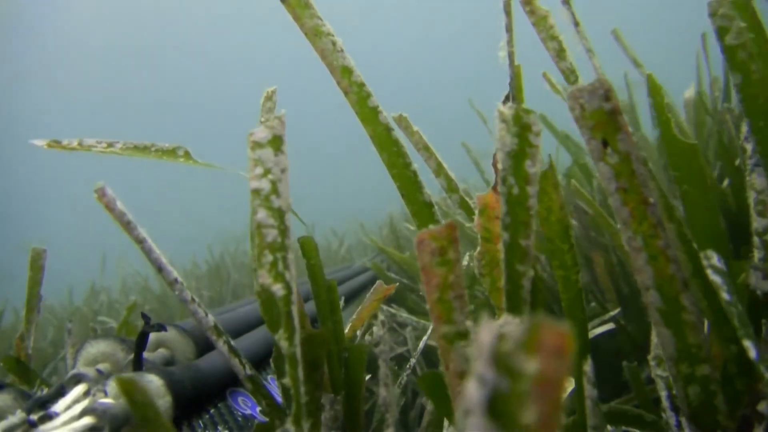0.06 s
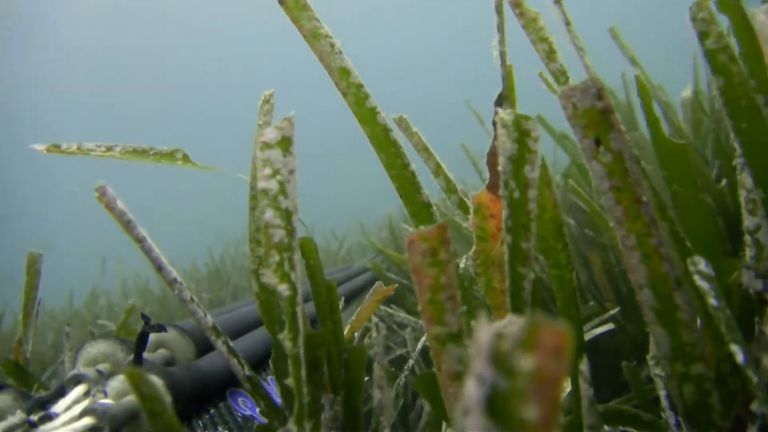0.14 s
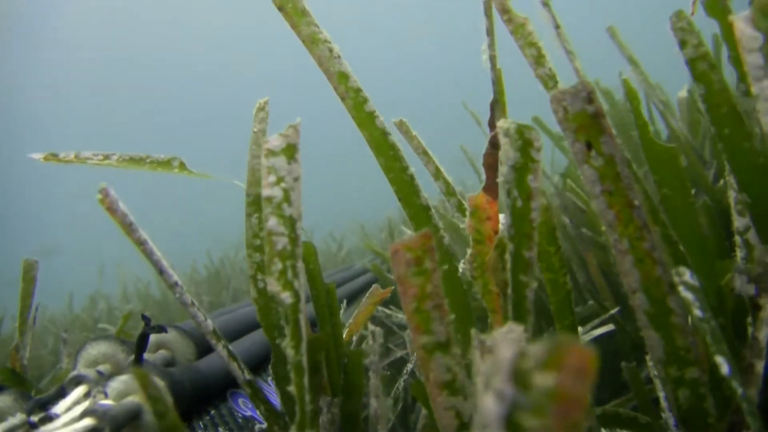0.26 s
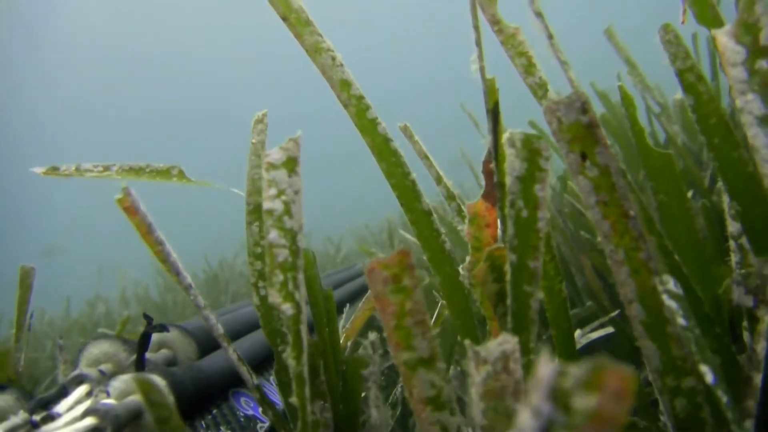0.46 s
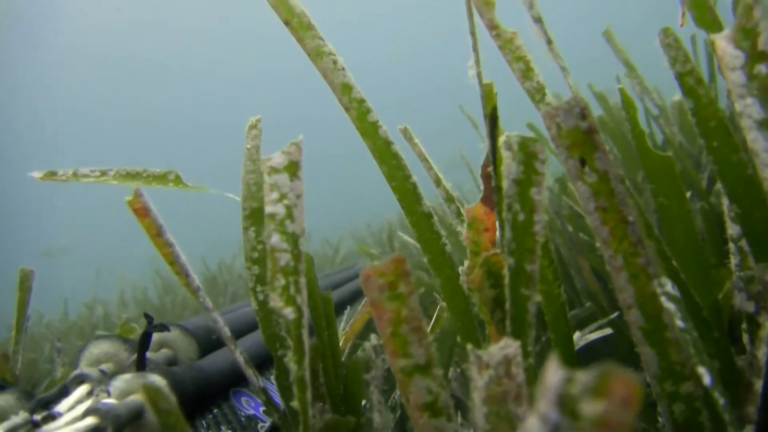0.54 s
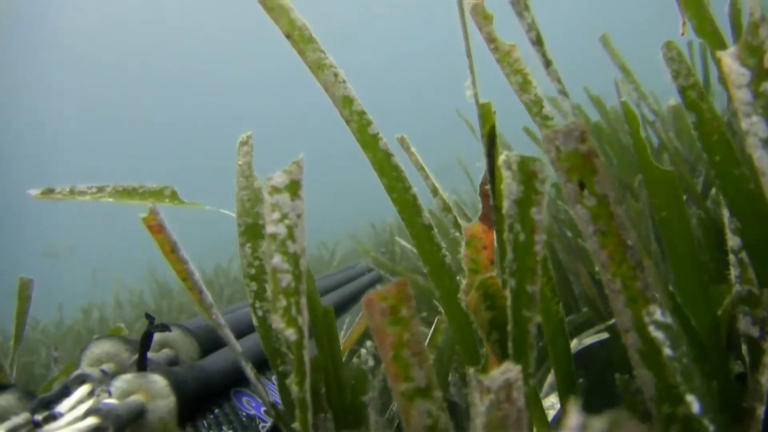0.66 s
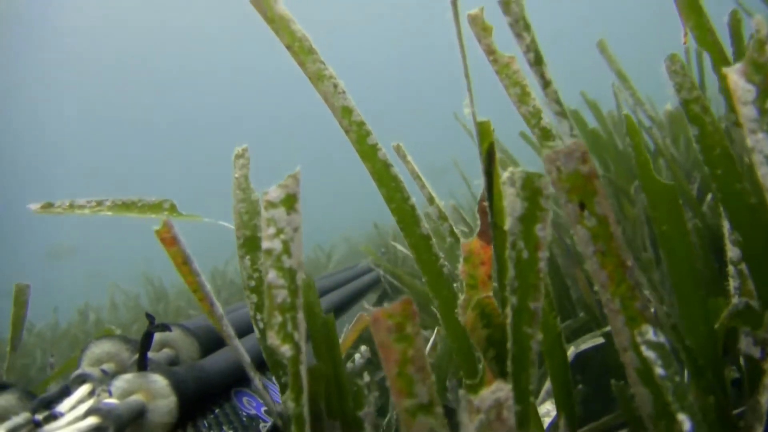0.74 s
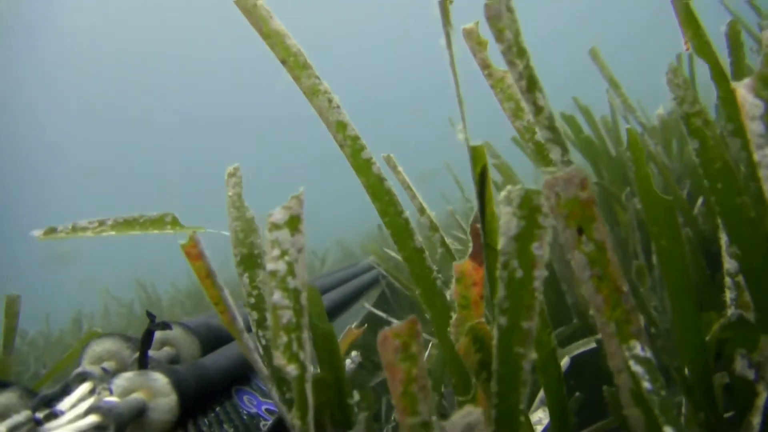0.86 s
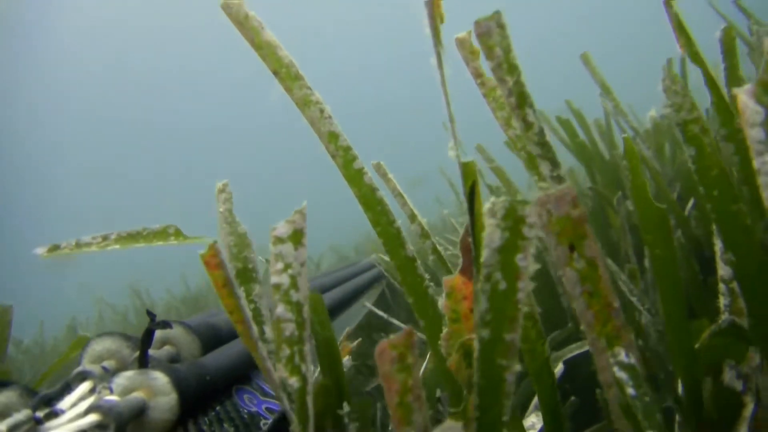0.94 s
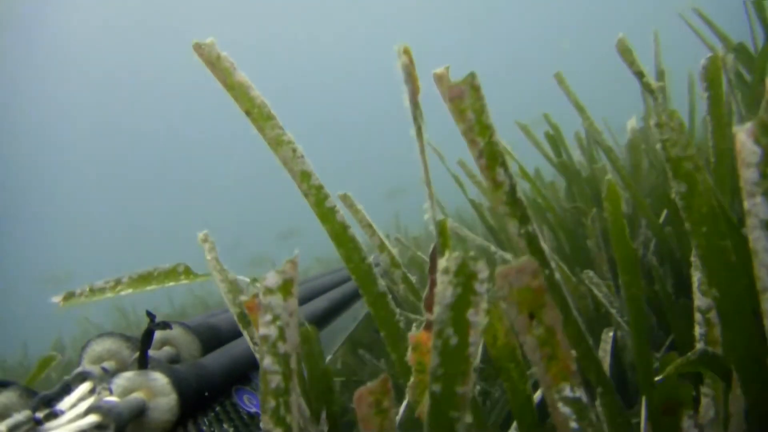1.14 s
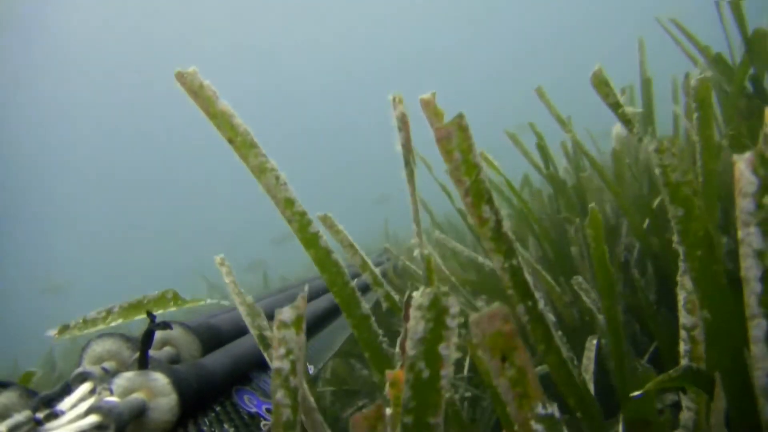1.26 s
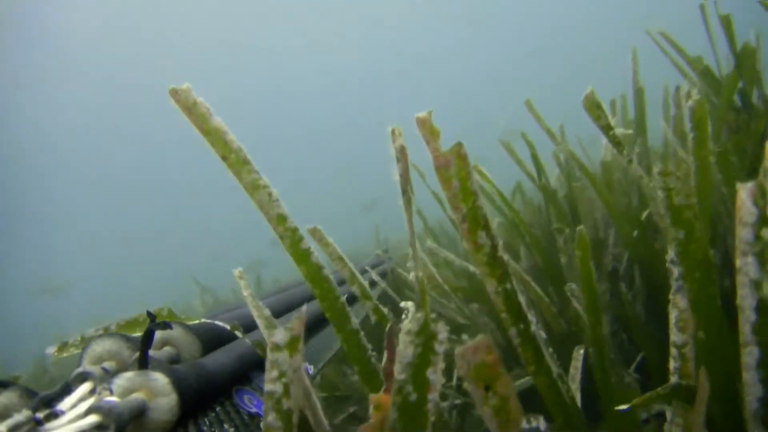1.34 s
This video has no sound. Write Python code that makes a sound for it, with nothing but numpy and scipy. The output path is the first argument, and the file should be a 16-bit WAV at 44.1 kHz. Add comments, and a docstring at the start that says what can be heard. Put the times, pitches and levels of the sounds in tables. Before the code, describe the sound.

A fish seems to grunt twice underwater amid rustling seagrass, tiny clicks and low rumble.

```python
"""A seagrass bed under water, heard from inside a camera housing.
Leaves brush the housing more and more busily and bump it softly; they and the moving water set it ringing.
Two short grunts, perhaps a fish, are pulse trains that slow quickly and fall through low resonances.
A few sharp clicks, probably snapping shrimp, cut through a low water rumble and a faint hiss."""
import sys
import numpy as np
from scipy import signal
from scipy.fft import rfft, irfft
from scipy.io import wavfile

SR = 44100
rng = np.random.default_rng(int(sys.argv[2]) if len(sys.argv) > 2 else 0)


def wrap_up_sound(samples):
    """Save the sound to the file named by the first command line argument, as 16-bit audio."""
    columns = np.atleast_2d(samples).T
    # keep every value between -1 and 1, then stretch to whole-number steps
    tamed = np.clip(columns, -1, 1)
    steps = np.round(tamed * 32767).astype(np.int16)
    wavfile.write(sys.argv[1], SR, steps)


N = 61739
TIME = np.arange(N) / SR

# colour of the water rumble: freq_hz, relative_db
RUMBLE_SPECTRUM = [(20, -14), (50, -17), (90, -1), (150, 0), (200, 0), (280, -4.5), (420, -6.5), (800, -1),
                   (3000, -57)]
# colour of the hiss: freq_hz, relative_db
HISS_SPECTRUM = [(300, 8.5), (1500, 12), (2300, -5.5), (4700, 0), (6000, -3.5), (9400, 1.5), (10300, -11.5),
                 (11300, -45.5), (15500, -19)]
# how hard the leaves brush: time_s, force_db
BRUSH_FORCE = [(0, -60), (.15, -41), (.25, -44), (.31, -47), (.42, -42.5), (.55, -48.5), (.66, -41.5),
               (.72, -38.5), (.83, -43), (.91, -42.5), (.97, -35), (1.06, -35), (1.13, -32.5),
               (1.21, -32.5), (1.27, -33), (1.33, -37.5), (1.4, -40.5)]
# modes of the housing: pitch_hz, width_hz, brushed_db, bumped_db, stereo_likeness
HOUSING_MODES = [(553.3, 36.6, -8, -4, 0.78), (656, 47, -12.5, -10.5, 1), (803, 58, -5, -36.5, 0.86),
                 (972, 100, -12.5, -38.5, .55), (1277, 110, -8, -41.5, 0.076), (1500, 150, -21, -12, -0.94),
                 (1666, 91, -12.5, -33, 0.71), (2750, 1800, -14.5, -20, -1.3),
                 (3626, 130, -35.5, -21.5, 0.12), (4700, 630, -21.5, -22, -0.52)]
# single leaves flicking across: start_s, level_db, pitch_hz
LEAF_FLICKS = [(.136, -48, 724), (0.457, -35.5, 1483), (0.693, -28, 780), (.698, -32.5, 1370),
               (.711, -31.5, 810), (.771, -28.5, 788), (.886, -29, 1360), (0.921, -27.5, 855),
               (.955, -26.5, 1345), (.984, -40, 798), (1.028, -32, 1723), (1.108, -28, 783),
               (1.169, -27.5, 820), (1.194, -25, 868), (1.249, -34, 930)]
# soft bumps on the housing: start_s, strength_db
SOFT_BUMPS = [(.013, -33.5), (0.044, -38), (.119, -29.5), (.203, -30), (.329, -28.5), (0.353, -27.5),
              (0.413, -61), (.439, -27), (.468, -24), (.757, -32), (.868, -37), (.957, -30.5), (1.005, -45),
              (1.215, -39), (1.348, -27)]
# sharp clicks: start_s, level_db, pitch_hz, wall_ring_db
SHARP_CLICKS = [(0.1209, -29.5, 5900, -7), (0.177, -38, 6770, -15), (0.267, -35.5, 6000, 3),
                (0.4492, -27, 6000, 7), (0.4506, -25.5, 7540, -3), (0.4542, -31, 7900, -7),
                (0.463, -31, 4470, -14), (0.695, -35, 4640, -5.5), (1.071, -35.5, 6340, -29),
                (1.385, -24.5, 6350, 7.5), (1.391, -28.5, 7600, 4.5)]
# one curve per grunt: time_s, pulse_rate_hz, drive_db, overtone_db
GRUNT_CURVES = [
    [(.220, 305.5, -27, -10), (.233, 270.6, -20.5, 6.5), (.251, 204.4, -14.5, -10.5),
     (.266, 172.7, -15.5, 4), (.281, 100.8, -24, 4), (.298, 104, -17, -5.5), (.314, 90, -55, 1)],
    [(.590, 244, -29, 4), (.598, 239, -25, 5), (.613, 202.6, -18.5, 0), (.627, 175.6, -12.5, -1),
     (.642, 116, -26, 8.5), (.654, 102, -15, -10), (.661, 99, -24, 4)],
]
# first four harmonics of the grunt pulses: level_db
PULSE_HARMONICS = [1, -11, -25.5, -50.5]
# resonances the grunts fall through: pitch_hz, width_hz, gain_db
GRUNT_RESONANCES = [(189, 19.3, 13.5), (245, 20.4, 11), (330, 30, -2.5), (548, 130, 7)]


def from_db(db):
    """Decibels to gain."""
    return 10 ** (np.asarray(db) / 20)


def unit_rms(x):
    """Scale to rms 1."""
    return x / np.sqrt(np.mean(x ** 2) + 1e-20)


def cut(x, hz, kind, order=2):
    """Butterworth low- or high-pass."""
    return signal.sosfilt(signal.butter(order, hz, kind, fs=SR, output="sos"), x + 1e-18)


def resonate(x, hz, width_hz):
    """One resonance with gain 1 at its peak."""
    radius = np.exp(-np.pi * width_hz / SR)
    feedback = [1, -2 * radius * np.cos(2 * np.pi * hz / SR), radius ** 2]
    return signal.lfilter(np.array([1, 0, -1]) * (1 - radius ** 2) / 2, feedback, x + 1e-18)


def drift(hz):
    """Random wobble slower than hz, at rms 1."""
    return unit_rms(cut(rng.standard_normal(2 * N), hz, "low")[N:])


def stereo(pair, likeness):
    """Two unrelated signals as mid and side: likeness 1 is mono, 0 wide, -1 or less out of phase."""
    likeness = np.clip(likeness, -1, 1)
    mid = np.sqrt(1 + likeness) * pair[0]
    side = np.sqrt(1 - likeness) * pair[1]
    return np.array([mid + side, mid - side]) / np.sqrt(2)


def pan(left_db):
    """Left and right gains; positive leans left."""
    return from_db(np.array([[1], [-1]]) * left_db / 2)


def noise(spectrum):
    """Two unrelated noises of one colour."""
    hz, db = np.transpose(spectrum)
    bins_hz = np.maximum(np.fft.rfftfreq(N, 1 / SR), 1)
    colour = from_db(np.interp(np.log(bins_hz), np.log(hz), db))
    return unit_rms(irfft(rfft(rng.standard_normal((2, N))) * colour, N))


def swell(start_s, attack_s, decay_s):
    """Short rise to 1, then an exponential tail."""
    age = TIME - start_s
    return np.clip(age / attack_s, 0, 1) * np.exp(-np.maximum(age - attack_s, 0) / decay_s)


def rumble(level_db=-56, follow=.3):
    """A low bed of water that grows with the brushing and gives one dull thud."""
    brush_db = np.interp(TIME, *np.transpose(BRUSH_FORCE))
    bed = from_db(level_db + follow * (brush_db - brush_db.mean()))
    thud = from_db(-43) * swell(start_s=1.346, attack_s=.0016, decay_s=.0086)
    return (bed + thud) * stereo(noise(RUMBLE_SPECTRUM), likeness=.75)


def hiss(level_db=-51.5):
    """A faint, wide, steady hiss."""
    return from_db(level_db) * noise(HISS_SPECTRUM)


def leaves(slips_per_s=4000, slip_spread_db=2.5, flutter_db=1.5, rub_db=-2.5):
    """Dense little slips strike the housing's modes; each flick rubs harder and adds a hollow ring."""
    force = from_db(np.interp(TIME, *np.transpose(BRUSH_FORCE)) + flutter_db * drift(hz=35))
    out = 0
    for start_s, level_db, pitch_hz in LEAF_FLICKS:
        flick = from_db(level_db) * swell(start_s, attack_s=.0016, decay_s=.0075)
        force = np.hypot(force, from_db(rub_db) * flick)
        phase = 2 * np.pi * pitch_hz * (TIME - start_s)
        out += flick * stereo([np.sin(phase), np.cos(phase)], likeness=.66)
    slipping = rng.random(N) < slips_per_s / SR
    slip_db = slip_spread_db * np.minimum(rng.exponential(1, N), 4)
    slips = unit_rms(slipping * from_db(slip_db))
    for pitch_hz, width_hz, brushed_db, _, likeness in HOUSING_MODES:
        push = stereo(rng.standard_normal((2, N)), likeness) * slips * force
        makeup = np.sqrt(SR / (np.pi * width_hz))   # a narrow mode catches less of the noise
        out += from_db(brushed_db) * makeup * resonate(push, pitch_hz, width_hz)
    out = cut(out, 362, "high")
    return cut(out, 6060, "low", order=4) * pan(left_db=-1.5)


def bumps_and_wash(contact_hz=533, wash_db=-41.5, flutter_db=2.5):
    """Soft knocks and the wash of moving water ring the housing, mostly its lowest mode."""
    knocks = np.zeros(N)
    for start_s, strength_db in SOFT_BUMPS:
        knocks[int(start_s * SR)] = from_db(strength_db)
    knocks = cut(knocks, contact_hz, "low")
    wash = from_db(wash_db + flutter_db * drift(hz=18))
    out = 0
    for pitch_hz, width_hz, _, bumped_db, likeness in HOUSING_MODES:
        ring_samples = SR / (np.pi * width_hz)
        water = stereo(rng.standard_normal((2, N)), likeness) * wash
        push = water * np.sqrt(ring_samples) + knocks * ring_samples
        out += from_db(bumped_db) * resonate(push, pitch_hz, width_hz)
    return cut(out, 387, "high", order=4) * pan(left_db=4.5)


def clicks(decay_s=.00099, raw_crack_db=-48.5):
    """Each snap is a tiny crack of noise, coloured by its own pitch and by the housing wall."""
    out = 0
    for start_s, level_db, pitch_hz, wall_ring_db in SHARP_CLICKS:
        envelope = (TIME >= start_s) * np.exp(-np.abs(TIME - start_s) / decay_s)
        crack = rng.standard_normal((2, N)) * envelope
        ping = resonate(crack, pitch_hz, width_hz=520)
        wall = from_db(wall_ring_db) * resonate(crack, hz=4090, width_hz=800)
        snap = cut(ping + wall, 8530, "low", order=8) + from_db(raw_crack_db) * crack
        out += from_db(level_db) * snap / np.abs(snap).max()
    return out * pan(left_db=-5)


def grunt(curve, fade_s=.0012, damping_s=.017):
    """Rounded sawtooth pulses slow down; each harmonic rings the resonances it falls through."""
    time_s, pulse_rate_hz, drive_db, overtone_db = np.transpose(curve)
    start_s, end_s = time_s[0], time_s[-1]
    gate = np.clip(np.minimum(TIME - start_s, end_s - TIME) / fade_s, 0, 1)
    phase = 2 * np.pi * np.cumsum(np.interp(TIME, time_s, pulse_rate_hz) * (TIME >= start_s)) / SR
    fundamental, *overtones = [-from_db(db) * np.sin(k * phase) for k, db in enumerate(PULSE_HARMONICS, 1)]
    pulses = fundamental + from_db(np.interp(TIME, time_s, overtone_db)) * sum(overtones)
    drive = pulses * gate * from_db(np.interp(TIME, time_s, drive_db))
    ring = sum(from_db(db) * resonate(drive, hz, width_hz) for hz, width_hz, db in GRUNT_RESONANCES)
    choke = np.exp(-np.maximum(TIME - end_s, 0) / damping_s)   # damps the ring once the pulses stop
    body = cut((drive + ring) * choke, 900, "low", order=4)
    return cut(body, 95, "high") * pan(left_db=-1)


def scene():
    """Grunts over leaves, bumps and clicks, on a bed of rumble and hiss."""
    grunts = sum(grunt(curve) for curve in GRUNT_CURVES)
    return grunts + leaves() + bumps_and_wash() + clicks() + rumble() + hiss()


def record(dry, cutoff_hz=15800):
    """A steep low-pass takes off the very top."""
    return signal.sosfilt(signal.ellip(10, .1, 80, cutoff_hz, fs=SR, output="sos"), dry)


dry = scene()
out = record(dry)
wrap_up_sound(out)
```